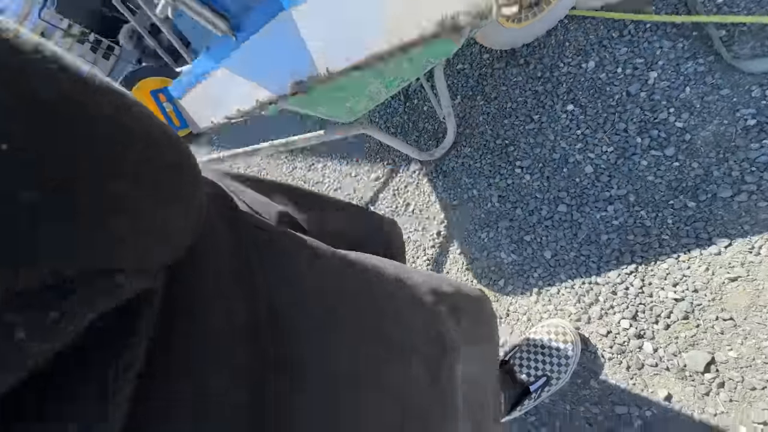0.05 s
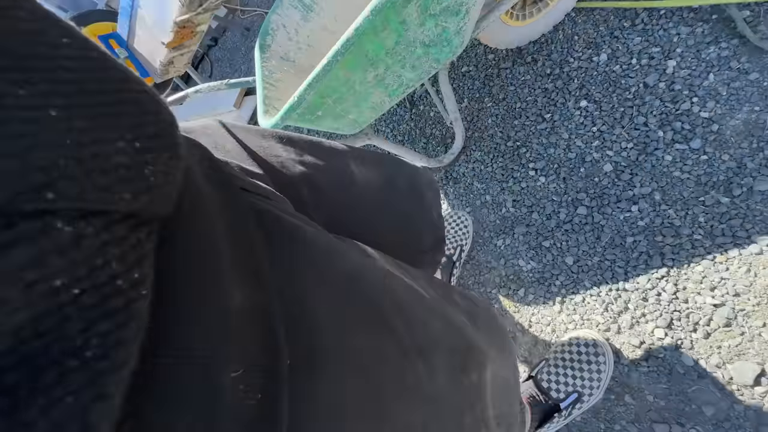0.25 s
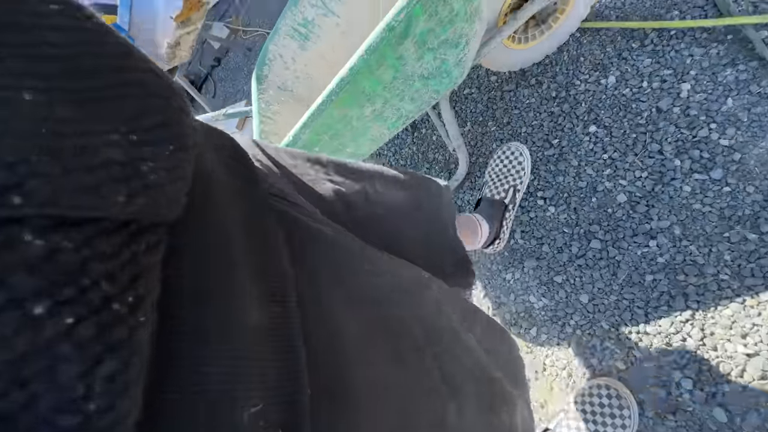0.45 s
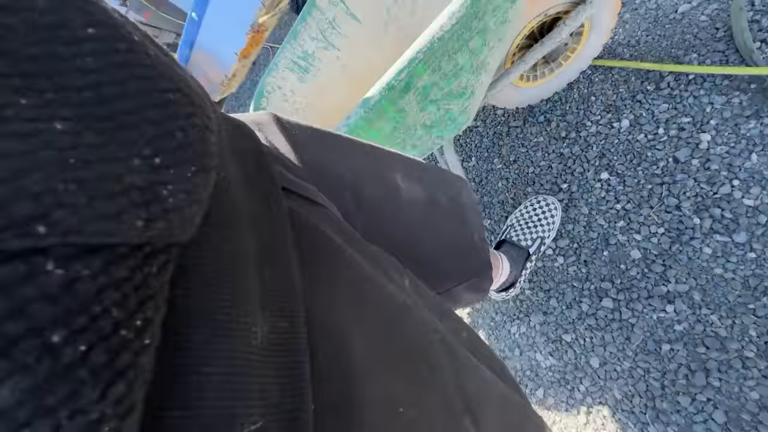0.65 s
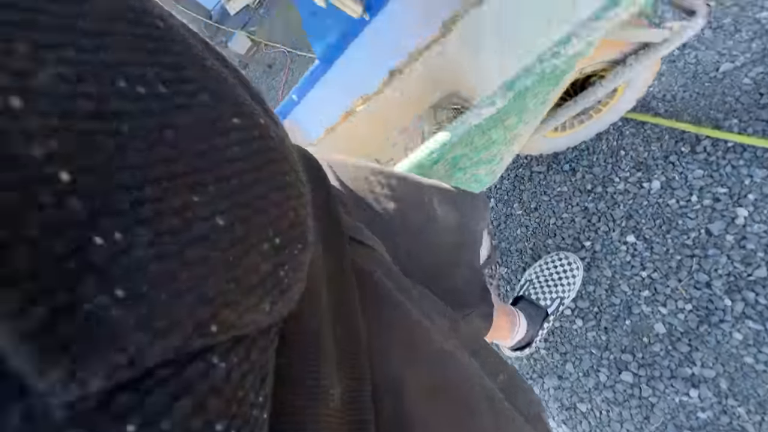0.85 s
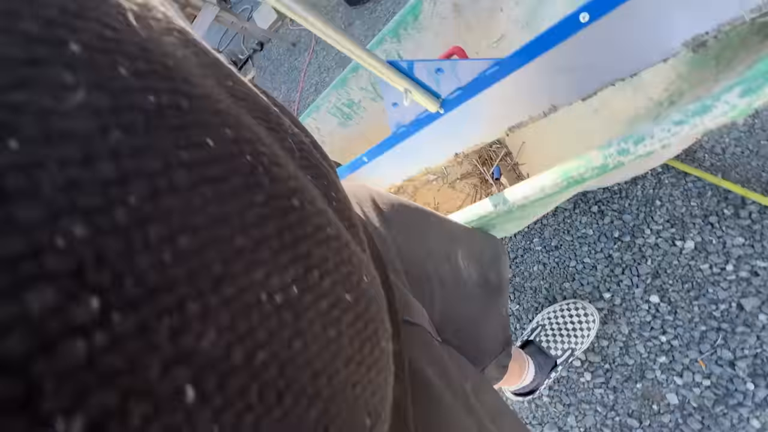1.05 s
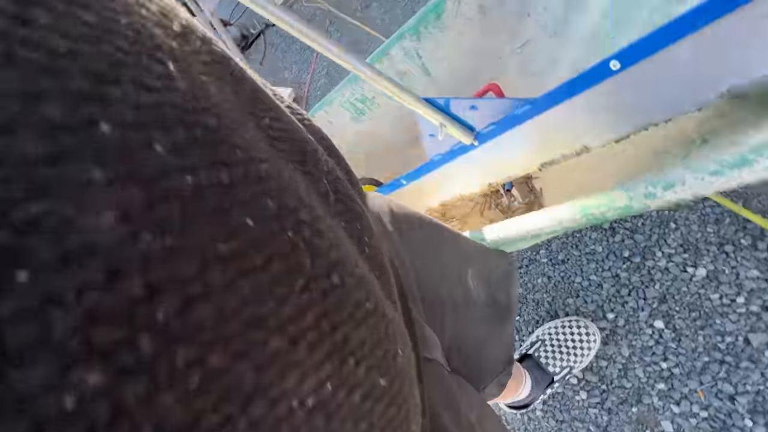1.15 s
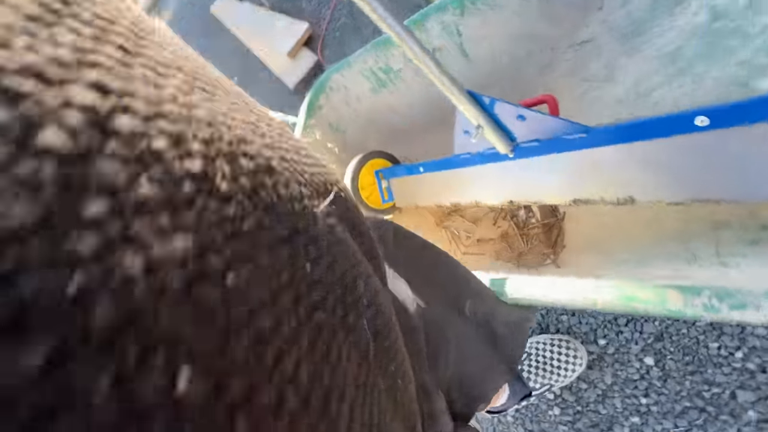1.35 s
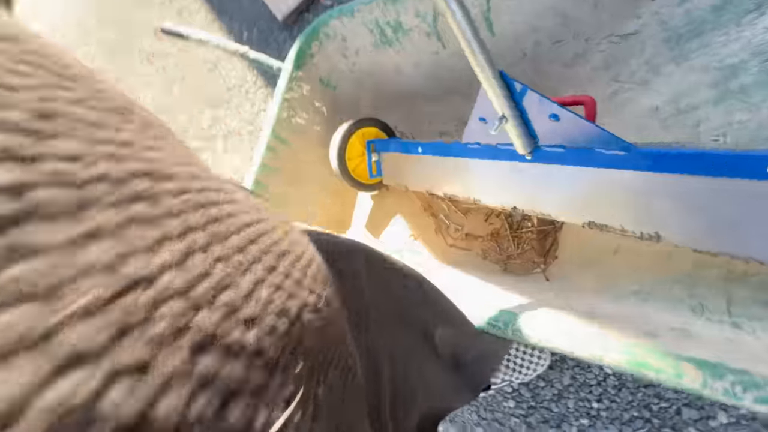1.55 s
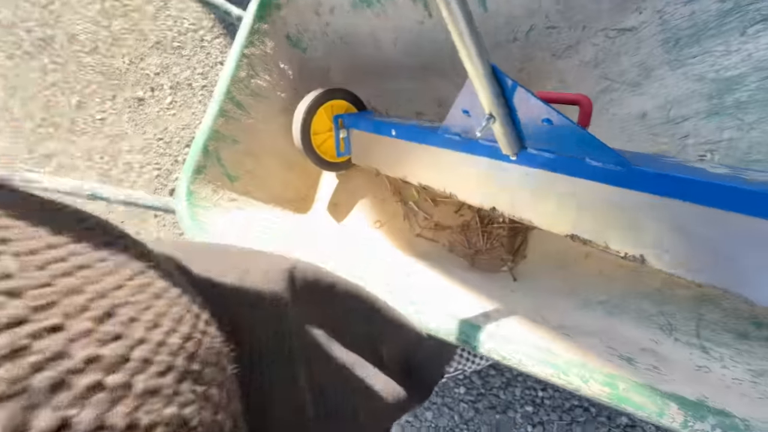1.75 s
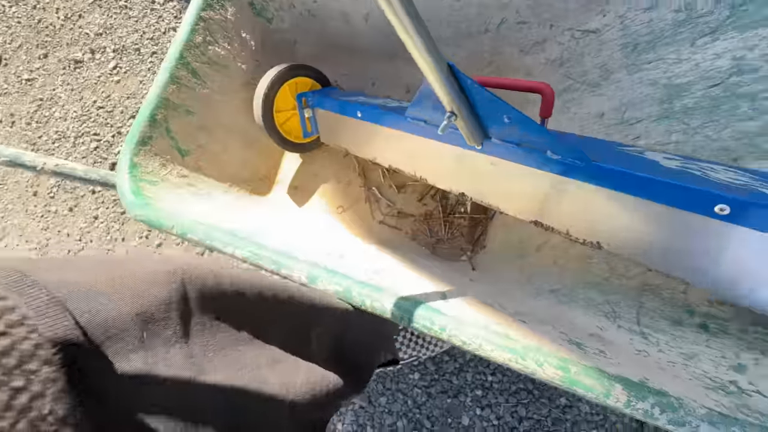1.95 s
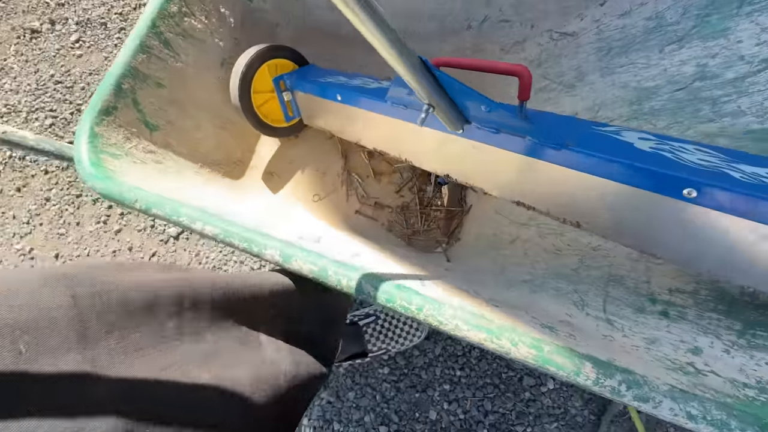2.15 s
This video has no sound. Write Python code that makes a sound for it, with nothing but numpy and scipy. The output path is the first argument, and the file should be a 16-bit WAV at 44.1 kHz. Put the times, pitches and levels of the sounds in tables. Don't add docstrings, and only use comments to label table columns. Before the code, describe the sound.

A magnetic sweeper clatters into a metal wheelbarrow outdoors. Until 0.95 s, only small gravel ticks and scrapes sound over a faint distant hum. At 0.98 s a loud hollow bang hits, then a second at 1.15-1.2 s with a dense nail shower and clanks until 1.4 s. A small spill follows at 1.5 s, then scattered clinks around 1.7 and 1.95 s, soft bumps and low tub rumble to 2.2 s.

```python
import sys
import numpy as np
from scipy import signal
from scipy.fft import rfft, irfft
from scipy.io import wavfile
from scipy.ndimage import uniform_filter1d

SR = 44100
rng = np.random.default_rng(int(sys.argv[2]) if len(sys.argv) > 2 else 0)


def to_linear_factor(level_db):
    exponent = np.asarray(level_db, float) / 20
    return 10 ** exponent


def bounce(signal):
    frames = np.transpose(np.atleast_2d(signal))
    limited = np.clip(frames, -1, 1)
    pcm = np.round(limited * 32767).astype(np.int16)
    wavfile.write(sys.argv[1], SR, pcm)


N = 96799
t = np.arange(N) / SR
bins_hz = np.arange(N // 2 + 1) * SR / N + 1e-3

# [f/Hz, level/dB, t60/s]
TUB_MODES = [(77.6, -9, 0.59), (106.5, -2, 0.16), (140, 4, 0.1), (155, -14, 0.088), (184.3, -9, 0.21),
             (213.4, 6, 0.038), (285, -4.5, 0.05), (327.6, 0.5, 0.07), (332, -4.5, 0.03), (416.6, 7, 0.026),
             (492, -4.5, 0.059), (563, -3.5, 0.12), (690, 1.5, 0.049), (754, -13, 0.22)]
# [f/Hz, level/dB, t60/s]
BAR_MODES = [(876, 0.5, 0.025), (986, -1, 0.096), (1120, -6, 0.18), (1400, -25, 0.014), (1523, -15, 0.13),
             (1680, 3, 0.0061), (2160, 3, 0.0047), (2220, -25, 0.029)]


def on_log(points):
    p = np.array(points, float)
    return np.interp(np.log(bins_hz), np.log(p[:, 0]), p[:, 1])


def unit(x):
    return x / np.sqrt(np.mean(x ** 2))


def since(start_s):
    return np.clip(t - start_s, 0, None)


def decay(u, t60_s):
    return np.exp(-np.log(1000) * u / t60_s)


def curve(rows):
    r = np.array(rows, float)
    return to_linear_factor(np.interp(t, r[:, 0], r[:, 1], left=-90 if r[0, 0] > .5 else None))


def colour(x, points):
    cepstrum = irfft(on_log(points) * np.log(10) / 20, N)
    cepstrum[1:N // 2] *= 2
    cepstrum[N // 2 + 1:] = 0
    h = np.exp(rfft(cepstrum))
    return irfft(rfft(x, N) * h / np.sqrt(np.mean(np.abs(h) ** 2)), N)


def walk(rate_hz):
    k = int(SR / rate_hz)
    steps = np.repeat(rng.standard_normal(N // k + 1), k)
    return unit(uniform_filter1d(uniform_filter1d(steps, k), k)[:N])


def grains(rough_db):
    size_db = rough_db * np.repeat(rng.exponential(size=N // 8 + 1), 8)[:N]
    return unit(rng.standard_normal(N) * to_linear_factor(size_db))


def port_phase(hz):
    # [f/Hz, lead/rad]
    lead_rows = [(0, -.8), (150, -.5), (400, -.7), (700, -1.7), (1120, -3), (1900, -6.3), (4500, -7.5),
                 (6800, -8), (8000, -10.3), (9500, -11.4), (11800, -13.8), (13300, -17.6), (14200, -18.8),
                 (16000, -22)]
    p = np.array(lead_rows, float)
    return np.interp(hz, p[:, 0], p[:, 1])


def ports(x, own):
    # [f/Hz, level/dB]
    scatter_rows = [(500, -8), (2000, -2), (8000, 2), (12500, -24)]
    left = irfft(rfft(x) * np.exp(1j * port_phase(bins_hz)), N)
    scattered = irfft(rfft([own, np.roll(own, 70)]) * to_linear_factor(on_log(scatter_rows)), N)
    return np.array([left, x]) + scattered


def ring(x, modes):
    out = np.zeros((2, N))
    for (hz, db, t60_s), chance in zip(modes, rng.standard_normal(len(modes))):
        pole = np.exp(2j * np.pi * hz / SR - np.log(1000) / (t60_s * SR))
        z = signal.lfilter([to_linear_factor(db)], [1, -pole], x)
        lead = port_phase(hz) + chance * min(hz / 3500, 1)
        out += np.array([np.imag(z * np.exp(1j * lead)), np.imag(z)])
    return out


def shower_level():
    # [t/s, level/dB]
    shower_rows = [
        (1.18, -34),
        (1.192, -30),
        (1.33, -34),
        (1.37, -34),
        (1.40, -52),
        (1.42, -93),
        (1.482, -53.5),
        (1.498, -44),
        (1.55, -90),
    ]
    return curve(shower_rows) * (t < 1.55)


def knocks():
    # [t/s, peak/dB, struck f/Hz, brightness/dB]
    knock_rows = [(0.952, -27.5, 308, -11), (.983, 5, 478, -26), (0.998, -7.5, 212, -22),
                  (1.010, 1, 481, -23.5), (1.022, 0, 287, -19.5), (1.036, -21.5, 606, -7.5),
                  (1.059, -9, 140, -47), (1.151, -8, 513, -14), (1.159, -0.5, 169, -24),
                  (1.189, 1.5, 265.5, -15), (1.197, -9.5, 197, -18.5), (1.205, -14, 396, -6.5),
                  (1.319, -7.5, 70.7, -38), (1.438, -10, 193, -28.5), (1.958, -20, 413, -13),
                  (1.995, -13.5, 207, -23), (2.069, -12.5, 203, -48), (2.119, -18, 163, -26)]
    push_cycles, rattle_s = 3.03, 0.0085
    push, tick = np.zeros(N), np.zeros(N)
    for s, db, hz, bright_db in knock_rows:
        u = np.clip((t - s) * hz / push_cycles, 0, 1)
        window = np.sin(np.pi * u) ** 2
        push += to_linear_factor(db) * window * np.sin(2 * np.pi * push_cycles * u) / window.sum()
        tick += to_linear_factor(db + bright_db) * (t > s - .0015) * np.exp(-np.abs(t - s) / rattle_s)
    rattle = uniform_filter1d(tick * grains(1.5), size=8)
    drum = shower_level() * to_linear_factor(-19) * grains(3.04)
    tub = 0.5 * ring(push + 0.12 * rattle, TUB_MODES) + ring(drum, TUB_MODES[8:])
    return tub + 0.074 * ring(rattle, BAR_MODES)


def patchy(x):
    lows = [0]
    for edge_hz in (1500, 2600, 4200, 6300, 8500, 11000):
        lows.append(signal.sosfilt(signal.butter(2, edge_hz, fs=SR, output="sos"), x))
    lows.append(x)
    return sum((b - a) * to_linear_factor(3 * walk(150) - 1) for a, b in zip(lows, lows[1:]))


def nails():
    # [t/s, peak/dB, brightness/dB]
    bunch_rows = [(0.9802, -24.5, -18), (1.0126, -12.5, 1), (1.149, -22.5, -20), (1.1872, -8, -2),
                  (1.195, -18, 18), (1.2022, -6.5, -4), (1.2116, -1.5, 5), (1.218, -9, -6),
                  (1.2235, -2.5, -8.5), (1.239, -4, -8), (1.259, -13.5, -16.5), (1.272, -2, -6),
                  (1.2983, -4, 14.5), (1.303, -21, -12), (1.332, -17.5, -9), (1.349, -4.5, 7.5),
                  (1.358, -6, 0.5), (1.3779, -16.5, -6), (1.394, -24.5, -10), (1.442, -37, -25),
                  (1.4853, -29, -3), (1.49, -24, -9), (1.496, -15.5, -7), (1.5004, -7.5, 2.5),
                  (1.505, -17, 10), (1.5162, -11.5, 3), (1.5957, -35.5, 10), (1.7051, -9, 10.5),
                  (1.714, -23, -9), (1.7258, -13, 1), (1.7474, -10, 9), (1.7536, -14.5, 4),
                  (1.765, -27, -7), (1.782, -21.5, 1), (1.797, -24, 3), (1.804, -37, -3),
                  (1.893, -30, -10.5), (1.9303, -22.5, -6), (1.937, -17.5, 1), (1.9529, -14.5, -1),
                  (1.964, -7, 2), (2.025, -25.5, -11), (2.0814, -24.5, 4), (2.172, -28.5, -6),
                  (2.178, -22.5, -11.5)]
    # [f/Hz, density/(dB per Hz)]
    steel_rows = [(350, -47), (600, 6.5), (1390, -1), (3710, -7.5), (4090, -7), (6580, -9), (7330, -7),
                  (10600, -4), (15500, -7.5)]
    nail_db, ping_db, tail_db = -8, -12, -8
    rise_s, bunch_s, ping_t60_s, tail_t60_s = .0005, 0.0022, 0.048, 0.072
    split_hz = 7240
    low = shower_level() * to_linear_factor(2.6 * walk(90))
    high, pings = low.copy(), np.zeros(N)
    for (s, db, bright_db), ping_hz in zip(bunch_rows, rng.uniform(3500, 14500, (len(bunch_rows), 2))):
        u = since(s)
        rise = to_linear_factor(db + nail_db) * (1 - np.exp(-u / rise_s) * (1 + u / rise_s))
        env = rise * (np.exp(-u / bunch_s) + to_linear_factor(tail_db) * decay(u, tail_t60_s))
        low = low + env * to_linear_factor(-bright_db / 2)
        high = high + env * to_linear_factor(bright_db / 2)
        tones = np.sin(2 * np.pi * ping_hz[:, None] * u).sum(0)
        pings += rise * to_linear_factor(ping_db) * decay(u, ping_t60_s) * tones
    low_share = 1 / (1 + (bins_hz / split_hz) ** 4)

    def steel(clicks):
        mixed = rfft(low * clicks) * low_share + rfft(high * clicks) * (1 - low_share)
        return colour(irfft(mixed, N), steel_rows)

    clicks, own_clicks = grains(1.8), grains(2.2)
    hits, scatter = steel(clicks), steel(own_clicks)
    sheet = to_linear_factor(-26.5) * ring(low * clicks, TUB_MODES[7:]) + to_linear_factor(-9.5) * ring(low * clicks, BAR_MODES)
    return ports(patchy(hits) + pings, patchy(scatter)) + 0.096 * sheet


def clanks():
    # [t/s, peak/dB, f/Hz]
    clank_rows = [(.983, -9, 560), (1.011, -8.5, 524), (1.195, -7.5, 543), (1.222, -13, 648),
                  (.982, -13, 1696), (.983, -33, 1130), (1.008, -17, 1630), (1.016, -9, 1050),
                  (1.021, -14, 1214), (1.037, -20, 1805), (1.187, -3.5, 1207), (1.191, -20, 1560),
                  (1.203, -5, 2530), (1.226, -31, 2050), (1.222, -8, 1290), (1.276, -34, 1940),
                  (1.363, -27, 1550), (1.491, -24.5, 1512), (1.5, -16, 1523), (1.515, -45, 565),
                  (1.527, -29, 1720), (1.544, -36, 1690), (1.709, -19, 1477), (1.708, -29, 4100),
                  (1.721, -32, 1360), (1.755, -22.5, 2026), (1.768, -28, 1990), (1.756, -33, 454),
                  (1.955, -28, 444), (1.8, -32.5, 2030), (1.962, -33, 1810)]
    rise_s, t60_cycles, longest_t60_s = 0.0018, 58, 0.054
    out = np.zeros(N)
    for (s, db, hz), split in zip(clank_rows, rng.uniform(.02, .06, len(clank_rows))):
        u = since(s)
        pair = np.sin(2 * np.pi * hz * u) + 0.41 * np.sin(2 * np.pi * hz * (1 + split) * u)
        env = (1 - np.exp(-u / rise_s)) * decay(u, min(t60_cycles / hz, longest_t60_s))
        out += to_linear_factor(db) * env * pair
    return ports(out, 0.46 * np.roll(out, shift=25))


def rocking():
    # [t/s, level/dB, boom f/Hz]
    rocking_rows = [(.96, -50, 140), (1.06, -25, 140), (1.14, -29.5, 147.6), (1.22, -22, 182.8),
                    (1.36, -29, 189.7), (1.416, -35.5, 165.3), (1.452, -29.5, 192), (1.49, -31.5, 155.1),
                    (1.568, -37, 150.3), (1.67, -36.5, 150.6), (1.71, -34.5, 107), (1.776, -34, 143.7),
                    (1.8, -36, 132.2), (1.84, -34.5, 158.9), (1.956, -32.5, 147.3), (2.03, -37, 154.6),
                    (2.104, -32, 155), (2.19, -31.5, 156)]
    r = np.array(rocking_rows, float)
    k = int(.008 * SR)
    re, im = (unit(uniform_filter1d(uniform_filter1d(rng.standard_normal(N), k), k)) for _ in range(2))
    phase = 2 * np.pi * np.cumsum(np.interp(t, r[:, 0], r[:, 2])) / SR
    boom = []
    for lead_rad in (-.5, 0):
        p = phase + lead_rad
        boom.append((.65 * re + .85) * np.cos(p) + .65 * im * np.sin(p))
    murmur = 0.012 * ring(rng.standard_normal(N), TUB_MODES[:11])
    return curve(rocking_rows) * to_linear_factor(1.5) * (np.array(boom) + murmur)


def gravel():
    # [t/s, peak/dB, f/Hz, treble/dB]
    tick_rows = [(0.146, -23, 1100, -76), (0.213, -23, 1400, -84), (0.265, -24, 1050, -80),
                 (0.344, -16, 1140, -65), (0.457, -11.5, 1200, -69), (0.479, -25.5, 1000, -53.5),
                 (0.536, -23, 500, -82), (0.534, -16.5, 1830, -50.5), (0.585, -21.5, 547, -49),
                 (0.593, -17.5, 563, -42), (0.607, -32, 3480, -47), (0.615, -21, 1710, -50),
                 (0.655, -21, 614, -54), (0.654, -15, 1910, -80), (0.671, -16.5, 1270, -59),
                 (0.815, -19, 1520, -44.5), (0.869, -9, 1550, -61), (0.949, -19, 1720, -60)]
    # [t/s, level/dB]
    slide_rows = [(0, -65), (.44, -85), (.516, -61), (.522, -49.5), (.64, -54.5), (.70, -58), (.96, -60.5),
                  (.985, -37.5), (1.05, -43.5), (1.13, -72), (1.42, -53), (1.68, -60.5), (1.72, -74),
                  (1.83, -51.5), (1.92, -57), (2.0, -43), (2.12, -60.5), (2.19, -42)]
    # [f/Hz, density/(dB per Hz)]
    grit_rows = [(710, -68), (1200, -2), (2040, -2.5), (3360, -20.5), (12300, -17.5), (14200, -20),
                 (16000, -20)]
    rise_s, body_t60_s, grit_t60_s = .0003, .0075, 0.022
    body, grit = np.zeros(N), np.zeros(N)
    rough = 1 + 0.19 * unit(uniform_filter1d(rng.standard_normal(N), size=20))
    for s, db, hz, treble_db in tick_rows:
        u = since(s)
        tones = np.sin(2 * np.pi * hz * u) * rough
        tones += .35 * np.sin(2 * np.pi * .5 * hz * u) + .25 * np.sin(2 * np.pi * 1.6 * hz * u)
        body += to_linear_factor(db) * (1 - np.exp(-u / rise_s)) * decay(u, body_t60_s) * tones
        grit += (u > 0) * to_linear_factor(treble_db + 11.5) * decay(u, grit_t60_s)
    grit = grit + curve(slide_rows) * to_linear_factor(0.5 + 2.4 * walk(70))
    heard, own = (colour(grit * grains(1.6), grit_rows) for _ in range(2))
    return ports(heard, own) + np.array([np.roll(body, shift=6), body])


def yard():
    # [f/Hz, density/(dB per Hz)]
    yard_rows = [(15, -53), (25, 2), (120, 3.5), (416, -11.5), (1260, -9), (2000, -21), (12500, -56),
                 (14000, -47), (16000, -77)]
    # [f/Hz, share/0-1]
    alike_rows = [(60, 0), (250, 0), (600, 0), (1500, 0)]
    spec = rfft(rng.standard_normal((2, N))) * to_linear_factor(on_log(yard_rows))
    alike = np.clip(on_log(alike_rows), 0, 1)
    spec *= np.sqrt(np.array([1 + alike, 1 - alike]))
    out = 0
    for hz in 25 * 2 ** np.arange(0, 9.6, .5):
        band = np.cos(np.pi * np.clip(np.log2(bins_hz / hz), -.5, .5)) ** 2
        out = out + irfft(spec * band, N) * to_linear_factor(2.2 * walk(9))
    return unit(np.array([out[0] + out[1], out[0] - out[1]])) * to_linear_factor(-41)


def scene():
    # [t/s, gain/dB]
    duck_rows = [
        (0, 1.5),
        (.75, 1.5),
        (.95, 4.5),
        (1.5, 0),
        (1.62, -3),
        (1.9, -1),
        (2.19, -3),
    ]
    return knocks() + nails() + clanks() + rocking() + gravel() + yard() * curve(duck_rows)


def low_pass(x):
    return signal.sosfilt(signal.butter(12, 16520, fs=SR, output="sos"), x)


def record(dry):
    left_db = on_log([(200, 3), (1300, -2.5)])
    low_cut = bins_hz ** 6 / (bins_hz ** 6 + 46 ** 6)
    x = irfft(rfft(dry) * low_cut * to_linear_factor(np.array([left_db, -left_db]) / 2), N)
    x = signal.sosfilt(signal.ellip(8, .2, 60, 16000, fs=SR, output="sos"), np.tanh(x))
    return low_pass(x)


dry = scene()
out = record(dry)
bounce(out)
```